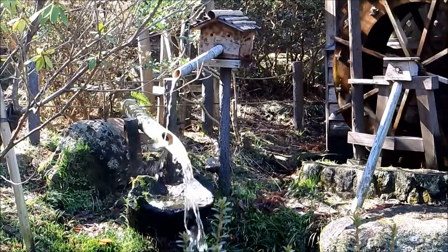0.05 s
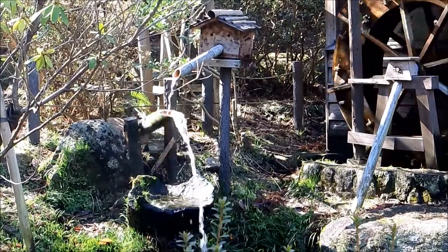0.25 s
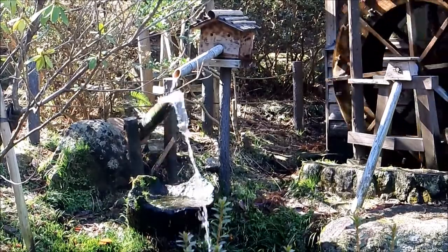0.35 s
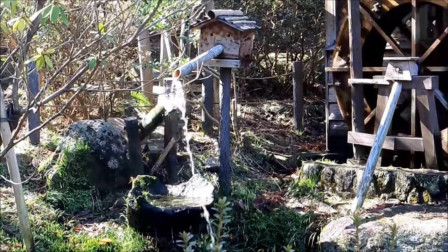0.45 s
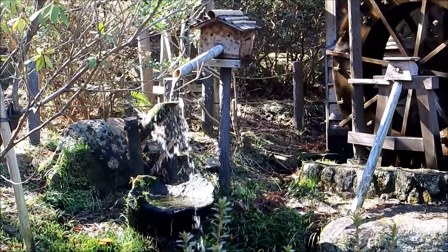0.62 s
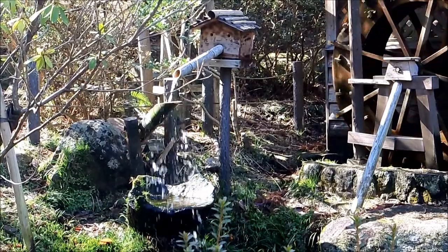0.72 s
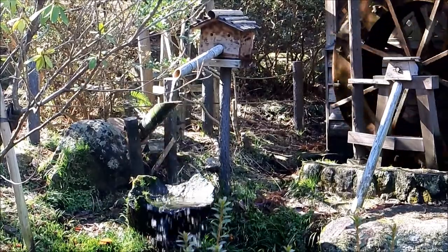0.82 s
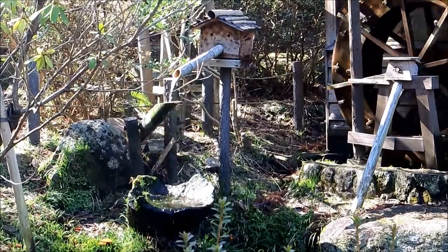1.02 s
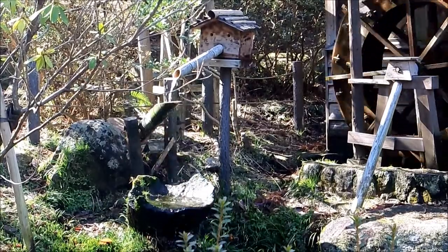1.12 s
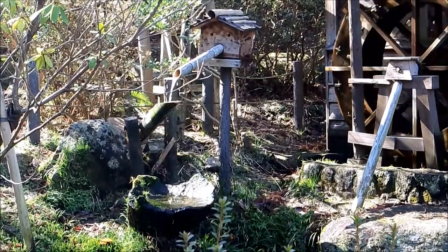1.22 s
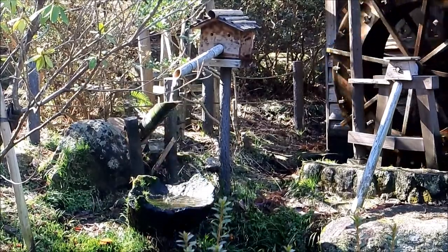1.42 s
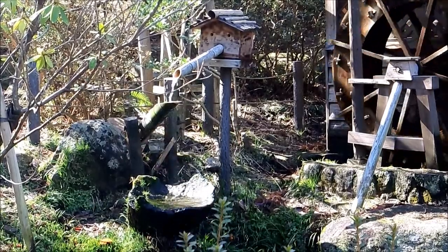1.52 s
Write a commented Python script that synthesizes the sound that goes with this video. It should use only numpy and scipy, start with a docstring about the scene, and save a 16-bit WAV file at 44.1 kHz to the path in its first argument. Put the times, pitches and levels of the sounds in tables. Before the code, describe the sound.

A bamboo tube knocks hollowly on stone straight ahead, clinking and rattling briefly. Just to the left, water splashes into a basin and dwindles to drops, with faint gurgles from the refilling tube and light garden wind on the microphone.

```python
"""Water spatters into a stone basin, a little left of the microphone, and thins to single drops.
Light wind buffets the microphone over a quiet garden. Straight ahead, the bamboo rocker that has just
poured falls back on its stone: the tube rings with a hollow knock and a short rattle, and its butt
clinks and grinds. The spout refills the tube, where pockets of air ring as a few gurgles."""
import sys
import numpy as np
from scipy import signal
from scipy.fft import rfft, irfft
from scipy.io import wavfile
from scipy.ndimage import uniform_filter1d

SR = 44100
rng = np.random.default_rng(int(sys.argv[2]) if len(sys.argv) > 2 else 0)


def wav_out(sig):
    """Save sig, one row per channel (or a flat mono array), as 16-bit PCM at SR to the path in sys.argv[1]."""
    wavfile.write(sys.argv[1], SR, np.round(np.clip(np.atleast_2d(sig).T, -1, 1) * 32767).astype(np.int16))


N = 68355
TIME = np.arange(N) / SR
SIDE = np.array([[1], [-1]])  # added on the left, subtracted on the right


def amp(db):
    """Decibels to gain."""
    return 10 ** (np.asarray(db) / 20)


def shape(x, curve):
    """Filter by a curve of (frequency [Hz], gain [dB]) points."""
    hz, db = np.array(curve, float).T
    bins = np.maximum(np.fft.rfftfreq(2 * N, 1 / SR), 1)
    gain = amp(np.interp(np.log(bins), np.log(hz), db))
    return irfft(rfft(x, 2 * N) * gain)[:N]


def colour(x, curve):
    """Filter and bring to unit level."""
    y = shape(x, curve)
    return y / np.std(y)


def noise(curve):
    """Unit noise of a given colour."""
    return colour(rng.standard_normal(N), curve)


def envelope(start, rise, t60, hold=0):
    """Straight rise, hold, exponential fall; all in seconds."""
    age = TIME - start
    return np.clip(age / rise, 0, 1) * np.exp(-np.log(1000) * np.maximum(age - rise - hold, 0) / t60)


def ring(start, rise, modes):
    """Damped modes set off at one moment."""
    age = TIME - start
    return sum(amp(db) * envelope(start, rise, t60) * np.sin(2 * np.pi * hz * age)
               for hz, db, t60 in modes)


def patter(curve, per_s=2600, tail_t60=0.025):
    """Droplets land at random as clicks of very unequal size, each with a tiny wet tail."""
    falls = rng.random(N) < per_s / SR
    size = amp(4 * np.minimum(rng.exponential(size=N), 4))
    clicks = falls * size * rng.choice([-1, 1], N)
    decay = np.exp(-2 * np.log(1000) / (tail_t60 * SR))
    tail_power = signal.lfilter([1 - decay], [1, -decay], clicks ** 2)
    tail = np.sqrt(tail_power) * rng.standard_normal(N)
    return colour(clicks + amp(-0.5) * tail, curve)


def bubbles(per_s=340, low_hz=1346, high_hz=5540, cycles=45, glide=0.1):
    """Small bubbles ring briefly, rising in pitch as they near the surface."""
    age = np.arange(4096) / SR
    out = np.zeros(N + len(age))
    for when, pitch_draw, size_draw in rng.random((int(per_s * N / SR), 3)):
        hz = low_hz * (high_hz / low_hz) ** pitch_draw
        life = age * hz / cycles  # 1 when the ring has fallen 60 dB
        size = amp(3 * min(-np.log(size_draw), 3))
        tone = np.sin(2 * np.pi * hz * age * (1 + glide * life / 2))
        first = int(when * N)
        out[first:first + len(age)] += size * np.exp(-np.log(1000) * life) * tone
    return out[:N] / np.std(out)


# Water falling into the basin (time [s], spray level [dB], relative splash level [dB])
BASIN_FLOW = [(0, -39.5, -43.5), (0.11, -41.5, -44), (0.145, -42.5, -47), (0.19, -36.5, -45.5),
              (0.21, -43, -44.5), (0.35, -41, -46.5), (0.49, -40, -47.5), (0.53, -44.5, -49.5),
              (0.6, -43, -44.5), (0.65, -48, -48.5), (0.68, -39.5, -53.5), (0.755, -45, -52),
              (0.785, -36.5, -47.5), (0.835, -38, -47.5), (0.92, -43, -49.5), (1.0, -43.5, -52.5),
              (1.11, -44, -52.5), (1.135, -47.5, -60), (1.165, -48, -58), (1.2, -51, -62),
              (1.275, -50.5, -63.5), (1.34, -47, -58.5), (1.41, -48.5, -61.5), (1.44, -44.5, -61),
              (1.55, -50, -59.5)]
# Colours of the fine spray and the low splash (frequency [Hz], relative level [dB])
SPRAY_COLOUR = [(1500, -28.5), (3500, -9), (5000, -5.5), (6000, -2.5), (7500, -0.5), (9100, 0.5),
                (10200, -12), (10800, -12), (11600, -10), (12800, -14), (16000, -19)]
SPLASH_COLOUR = [(100, -19), (300, -5.5), (600, -1.5), (900, 1), (1600, 2), (2600, 1), (3800, 1),
                 (5500, -2), (10000, -39)]


def stream():
    """Spray, splash and bubbles in the basin follow the dwindling flow."""
    when, spray_db, splash_db = np.array(BASIN_FLOW).T
    spray = amp(np.interp(TIME, when, spray_db)) * patter(SPRAY_COLOUR)
    splash = amp(-2) * patter(SPLASH_COLOUR) + amp(-7.5) * bubbles()
    return spray + amp(np.interp(TIME, when, splash_db)) * splash


# Gusts right on the microphone (time [s], level [dB])
GUSTS = [(0, -62), (0.1, -51.5), (0.175, -50.5), (0.24, -72), (0.58, -67.5), (0.676, -58), (0.85, -69.5),
         (0.914, -46), (0.945, -55), (0.975, -50.5), (1.03, -70), (1.12, -64), (1.16, -50), (1.22, -59),
         (1.275, -55.5), (1.37, -65), (1.41, -55.5), (1.55, -49)]
# Colours of the wind and of the garden beyond (frequency [Hz], relative level [dB])
WIND_COLOUR = [(15, -7), (35, 1), (70, -4), (110, -16.5), (250, -28.5), (800, -36.5)]
GARDEN_COLOUR = [(30, -12), (150, -5), (500, -4), (1500, -15.5), (5000, -6), (16000, -22)]


def air():
    """Gusts rumble on the microphone, unlike on each side, over the steady hush of the garden."""
    gust = amp(np.interp(TIME, *np.array(GUSTS).T))
    wind = noise(WIND_COLOUR) + amp(-1.5) * noise(WIND_COLOUR) * SIDE
    return gust * wind + amp(-57.5) * noise(GARDEN_COLOUR)


# Big drops in the basin (time [s], tick level [dB], slap level [dB], slap pitch [Hz])
BIG_DROPS = [(0.0112, -31, -49, 2970), (0.0827, -31, -40, 3590), (0.1142, -34, -34.5, 1490),
             (0.168, -32, -46, 1580), (0.1960, -30, -36, 3500), (0.5618, -34, -37.5, 1300),
             (0.5636, -38, -37, 2600), (0.5682, -36, -36.5, 2250), (0.5847, -24.5, -47, 3000),
             (0.6198, -28.5, -40.5, 1700), (0.633, -36, -40.5, 3200), (0.6700, -33.5, -44.5, 1710),
             (0.7103, -32, -48, 3000), (0.7824, -26.5, -36.5, 1600), (0.7994, -35, -37.5, 1600),
             (0.8133, -29, -42, 3000), (0.8165, -29, -48, 3000), (0.8326, -30, -38.5, 3200),
             (0.8740, -31, -49, 3000), (0.9342, -28.5, -55, 3020), (0.9767, -30.5, -41, 3220),
             (1.0275, -25.5, -41.5, 2500), (1.03, -34, -34.5, 3380), (1.1454, -32.5, -35.5, 2970),
             (1.1632, -31.5, -49, 3900), (1.2149, -42, -44.5, 1940), (1.2384, -31.5, -58, 4000),
             (1.299, -29.5, -53, 4600), (1.33, -33.5, -45, 5000), (1.3673, -30.5, -40, 2790),
             (1.457, -32, -39, 2460), (1.4618, -31.5, -44, 2370), (1.4833, -38, -48, 2760),
             (1.5440, -37, -41, 5640)]


def drops(slap_q=1 / 0.63):
    """A big drop ticks, slaps the surface, rings a bubble and scatters droplets."""
    out, bright, droplets = 0, noise(SPRAY_COLOUR), patter(SPRAY_COLOUR)
    for start, tick_db, slap_db, hz in BIG_DROPS:
        b, a = signal.iirpeak(hz, slap_q, fs=SR)
        band = signal.lfilter(b, a, signal.lfilter(b, a, rng.standard_normal(N)))
        slap = band / np.std(band) * envelope(start, rise=0.00038, t60=0.02)
        plink = ring(start, rise=0.002, modes=[(hz, -9, 0.041)])
        tick = bright * envelope(start, rise=0.00025, t60=0.0084)
        scatter = amp(-14) * droplets * envelope(start, rise=0.003, t60=0.078)
        out += amp(tick_db) * (tick + scatter) + amp(slap_db) * (slap + plink)
    return out


# Blows of the tube on the stone, straight ahead (time [s], level [dB])
BLOWS = [(0.2156, -1.5), (0.2434, -14), (0.2830, -12.5)]
# Ring of the tube and its air column (frequency [Hz], relative level [dB], t60 [s])
TUBE_MODES = [(101.3, -39.5, 0.55), (203, -30, 0.8), (236.5, -35.5, 0.38), (304, -24.5, 0.26),
              (445.3, -37, 0.51), (500, -34, 0.4), (560, -30, 0.37), (763, -42, 0.35), (905, -24.5, 0.22),
              (1006, -25.5, 0.12), (1617, -33, 0.24), (1940, -28, 0.18), (2220, -51, 0.15),
              (2930, -31, 0.24)]
# Dense clatter of the split wood and its frame (frequency [Hz], relative level [dB])
WOOD_COLOUR = [(60, -35), (130, -7), (280, 0), (380, -5.5), (620, 1), (900, -1), (1300, -5.5), (2400, -6),
               (4200, -16.5), (9000, -15.5), (15000, -30)]


def bamboo():
    """Each blow rings the tube and shakes the frame; the garden returns a short tail."""
    out = 0
    settling = envelope(0, rise=0.001, t60=0.2, hold=0.413)  # coming to rest damps the tube
    for start, db in BLOWS:
        tube = ring(start, rise=0.0023, modes=TUBE_MODES)
        clatter = amp(-19.5) * envelope(start, rise=0.0046, t60=0.14) * noise(WOOD_COLOUR)
        echo = amp(-32) * envelope(start, rise=0.015, t60=0.72) * noise(WOOD_COLOUR)
        out += amp(db) * (settling * (tube + clatter) + echo)
    return out


# The butt grinding on the stone as it settles (time [s], level [dB], rise [s], hold [s], t60 [s])
GRINDS = [(0.2184, -24.5, 0.00038, 0.0016, 0.018), (0.223, -20, 0.00077, 0.0067, 0.089),
          (0.258, -28.5, .012, 0.041, 0.095)]
# Colour of the grit under it (frequency [Hz], relative level [dB])
GRIT_COLOUR = [(500, -12.5), (1500, -1.5), (2700, -4), (4700, -5.5), (5900, -0.5), (7600, -2), (8400, 3.5),
               (9400, 1), (10400, -12.5), (11600, -12), (12600, -14.5), (16000, -27)]
# Clink of the hard contact (frequency [Hz], level [dB], t60 [s])
CLINK_MODES = [(8212, -11.5, 0.069), (8920, -24.5, 0.11), (8960, -32, 0.066), (11600, -28, .06),
               (7170, -25, 0.076), (5930, -21, 0.073), (5545, -28, 0.092)]


def stone(contact_s=0.2218, rise_s=0.0013, squeak_hz=9430):
    """The butt cracks and clinks on the stone, grinding and squeaking thinly as it slides."""
    pressure = sum(amp(db) * envelope(start, rise, t60, hold) for start, db, rise, hold, t60 in GRINDS)
    crack = amp(-35) * envelope(contact_s, rise_s, t60=0.044) * rng.standard_normal(N)
    slide = envelope(0.255, rise=0.0033, t60=0.054, hold=0.023)
    squeak = amp(-32) * slide * np.sin(2 * np.pi * squeak_hz * TIME)
    return pressure * noise(GRIT_COLOUR) + crack + squeak + ring(contact_s, rise_s, CLINK_MODES)


# Gurgles inside the refilling tube (time [s], starting pitch [Hz], level [dB])
GURGLES = [(0.407, 797, -44.5), (0.414, 551, -43), (0.410, 425, -45), (0.430, 309.5, -49),
           (0.461, 246.6, -44.5), (0.865, 862, -53), (0.899, 1230, -50), (0.934, 635, -51),
           (1.003, 655, -46), (1.043, 243, -49.5), (1.082, 615, -53.5), (1.097, 1470, -58)]


def gurgles(sag_per_s=2.67):
    """Air pockets in the tube ring briefly with sagging pitch."""
    out = 0
    for start, hz, db in GURGLES:
        pitch = hz * np.exp(-sag_per_s * np.maximum(TIME - start, 0))
        tone = np.sin(2 * np.pi * np.cumsum(pitch) / SR)
        out += amp(db) * envelope(start, rise=0.0072, t60=0.13) * tone
    return out


# Scattered sound reaching the microphone from the sides (frequency [Hz], gain [dB])
SIDE_COLOUR = [(100, -22), (2000, -34), (4000, -29), (6500, -11), (9000, 0.5), (12000, -13.5), (16000, -18)]


def spread(x, side_db=0):
    """Reflections widen a sound, mostly in the treble: noise follows the loudness of each octave."""
    scattered = 0
    for hz in 125 * 2. ** np.arange(8):
        octave = signal.butter(3, [hz / 2, hz], "bandpass", fs=SR, output="sos")
        power = uniform_filter1d(signal.sosfiltfilt(octave, x) ** 2, size=128)
        band = signal.sosfilt(octave, rng.standard_normal(N))
        scattered += np.sqrt(np.abs(power)) * band / np.std(band)
    return x + amp(side_db) * shape(scattered, SIDE_COLOUR) * SIDE


def scene(right_lag_s=0.000011):
    """From the microphone: water a little to the left, the knock ahead, air all around."""
    left, right = spread(stream() + drops() + gurgles())
    delay = np.exp(-2j * np.pi * np.fft.rfftfreq(2 * N, 1 / SR) * right_lag_s)
    water = np.array([left, irfft(rfft(right, 2 * N) * delay)[:N]])
    knock = spread(bamboo() + stone(), side_db=-6.5)
    return water + knock + air()


# Balance of the two microphone ports (frequency [Hz], left minus right [dB])
PORT_BALANCE = [(100, 3), (1200, 2.5), (2400, 0.34), (6000, 0.5), (7100, -4), (7700, 1), (8500, 4),
                (9100, -0.5), (10300, 1), (11100, 7), (12000, -1), (13500, -1.5)]


def record(dry, top_hz=16000):
    """Each microphone port adds its own colour; the top is cut steeply."""
    ports = [shape(channel, [(hz, sign * db / 2) for hz, db in PORT_BALANCE])
             for channel, sign in zip(dry, (1, -1))]
    lowpass = signal.ellip(10, 0.2, 80, top_hz, fs=SR, output="sos")
    return signal.sosfilt(lowpass, np.array(ports))


dry = scene()
out = record(dry)
wav_out(out)
```